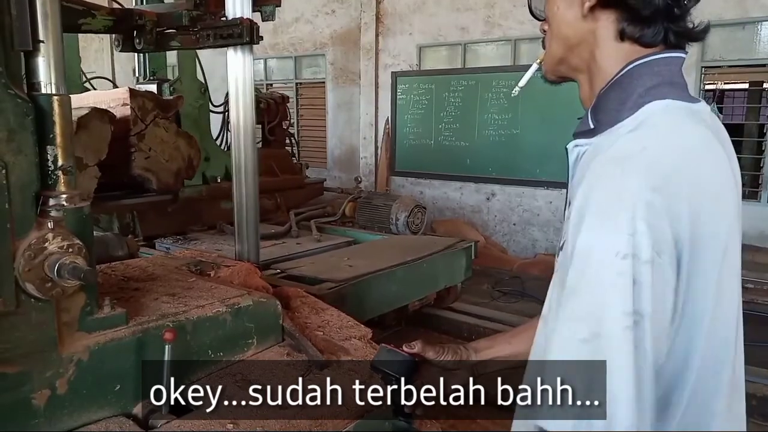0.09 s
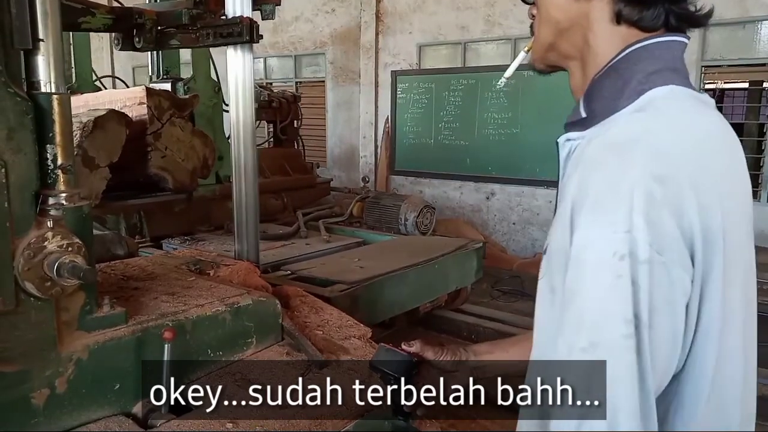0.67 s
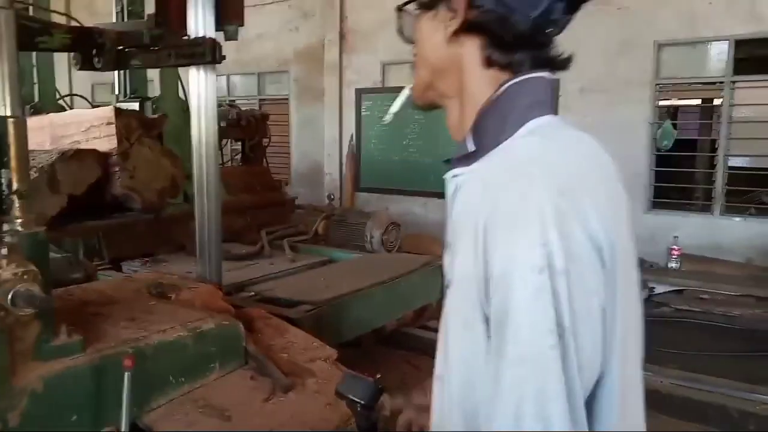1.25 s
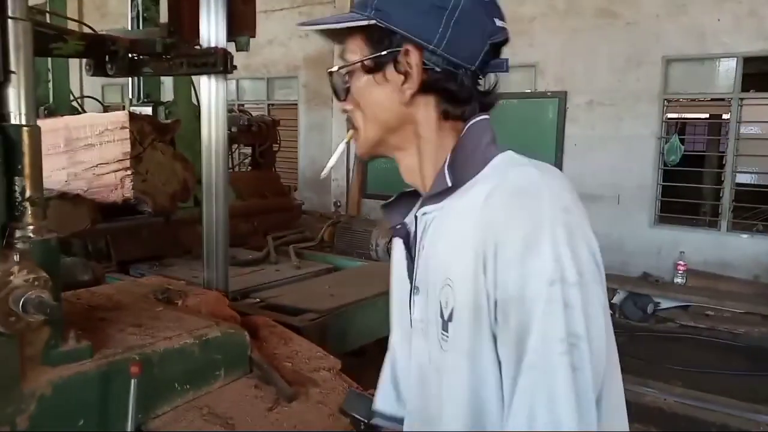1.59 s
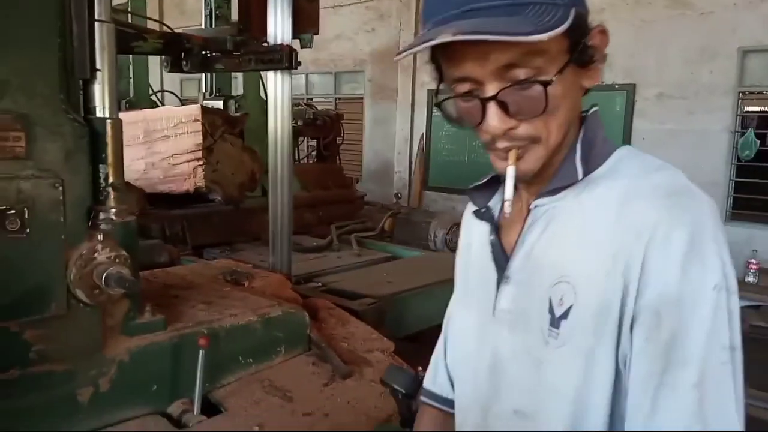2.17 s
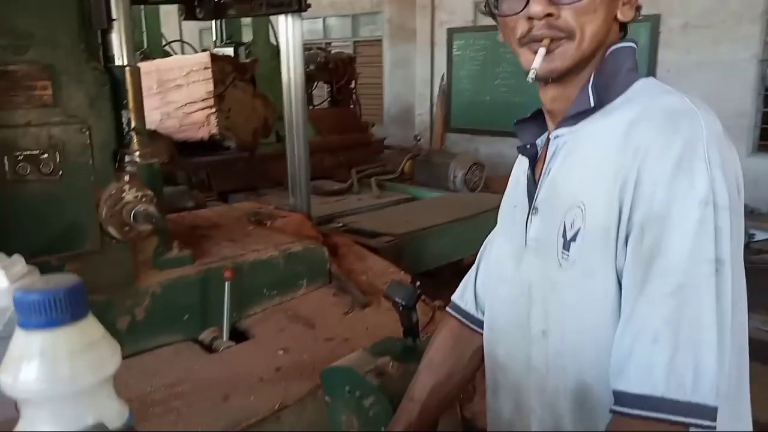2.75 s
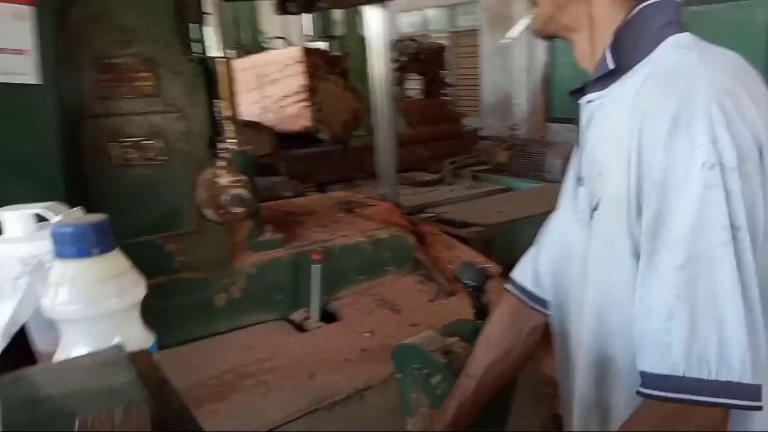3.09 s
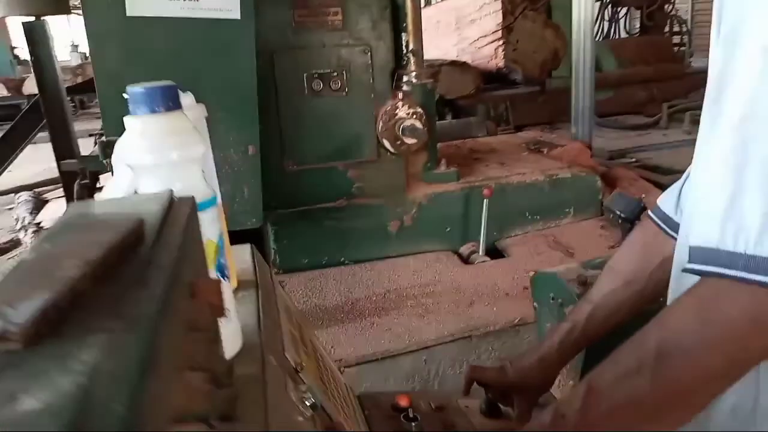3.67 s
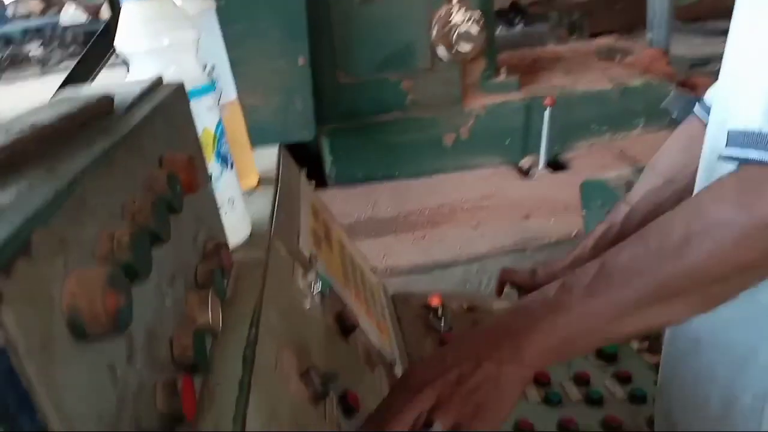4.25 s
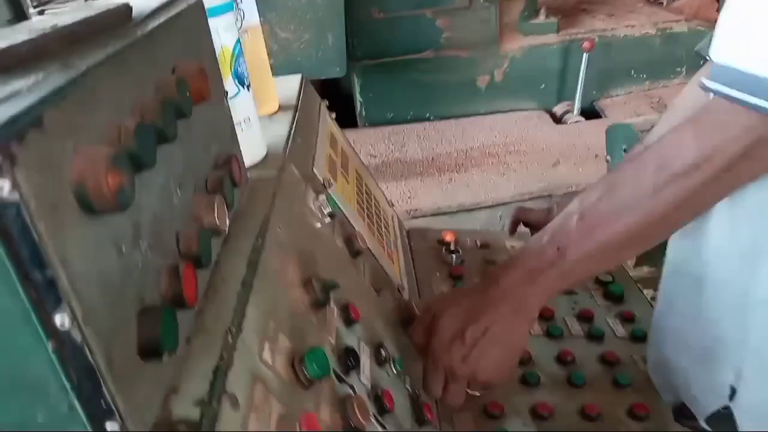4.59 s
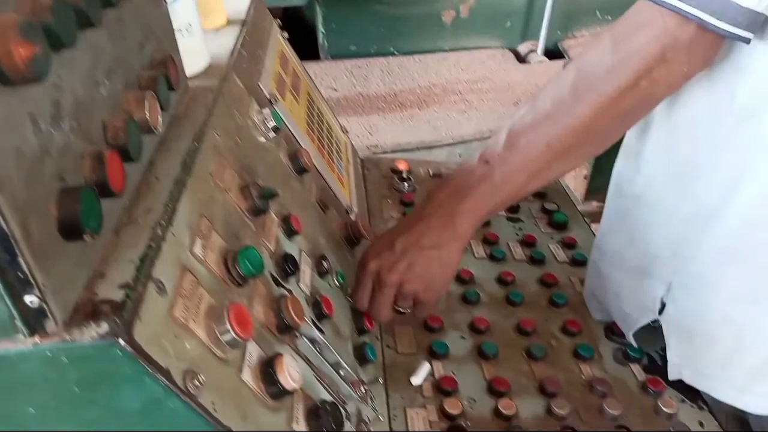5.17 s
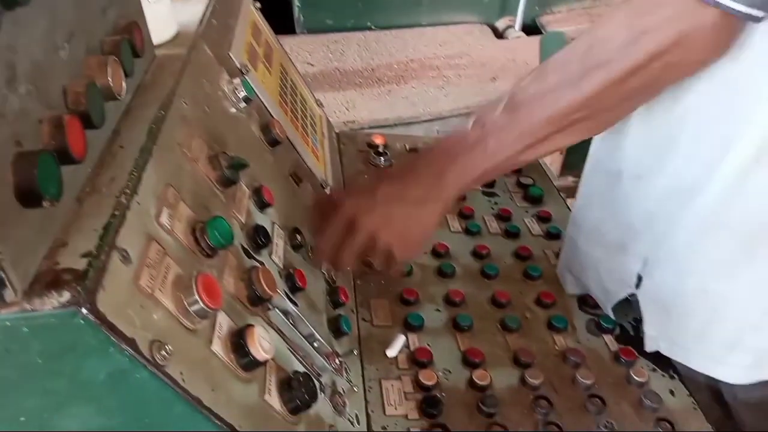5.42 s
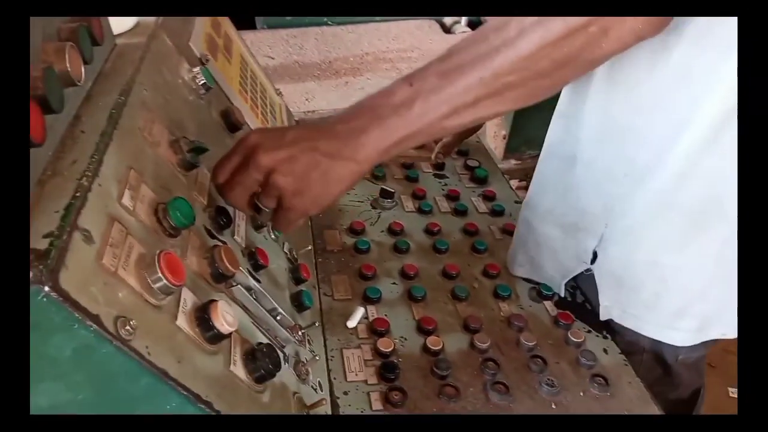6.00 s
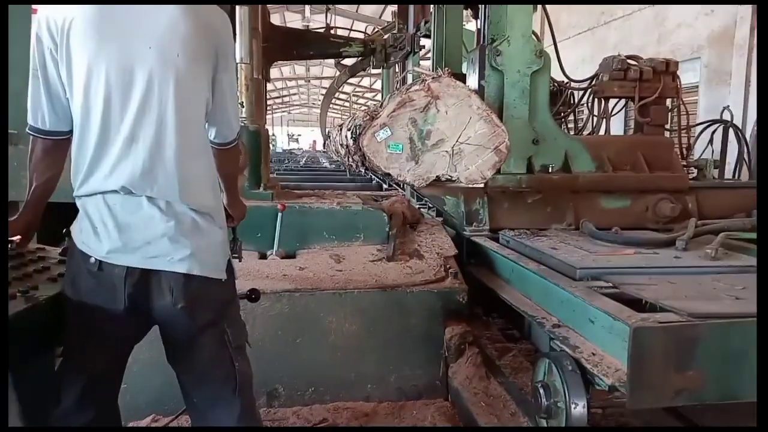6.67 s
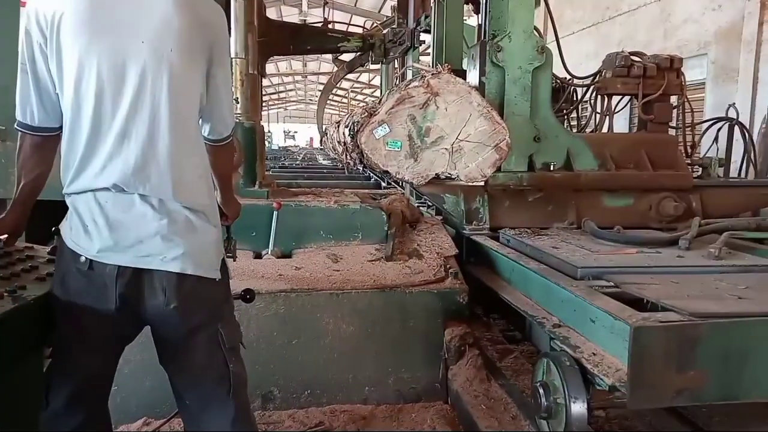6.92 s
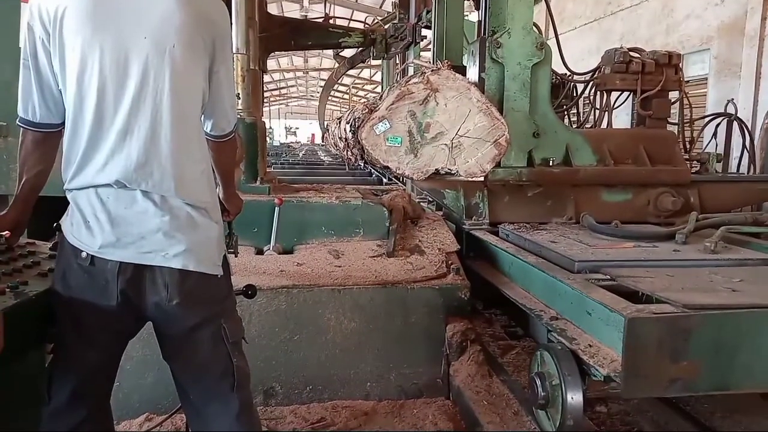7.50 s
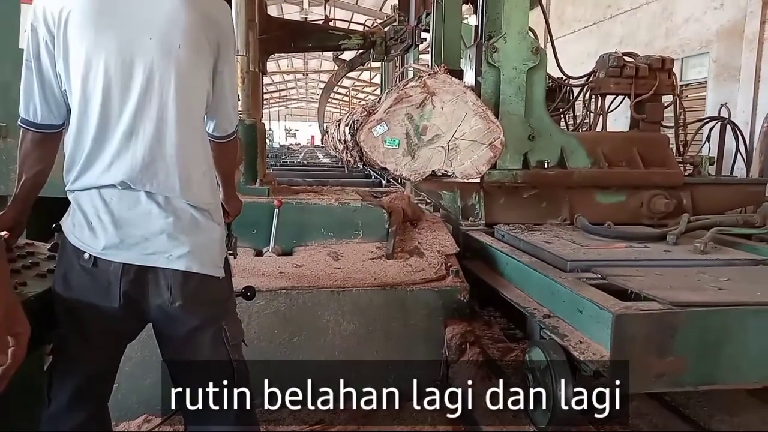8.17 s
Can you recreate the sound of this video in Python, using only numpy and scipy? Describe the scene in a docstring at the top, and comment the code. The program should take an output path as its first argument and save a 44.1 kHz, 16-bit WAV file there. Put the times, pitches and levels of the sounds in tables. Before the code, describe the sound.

Loud band saw ripping wood in a shed, rasping and hissing, with a wavering whine, low drone and a few dull bumps.

```python
"""A big band saw rips a log in a sawmill shed. The stereo microphone starts beside the control desk:
each tooth tears off a chip, so the cut rasps, hisses and whines at the tooth rate over the drone of frame
and drive. From about 1 s come a few dull bumps, and the cut fades a little as the microphone turns to the
controls. Near 4.5 s the loaded blade slows and the whine sags, then recovers. From about 6 s a slow
dissolve leads to the aisle behind the operator, where the same saw runs on."""
import sys
import numpy as np
from scipy import signal
from scipy.fft import rfft, irfft, next_fast_len
from scipy.io import wavfile
from scipy.ndimage import uniform_filter1d, minimum_filter1d, map_coordinates

SR = 44100
rng = np.random.default_rng(int(sys.argv[2]) if len(sys.argv) > 2 else 0)


def master(y):
    """Save y as 16-bit WAV."""
    cut = np.clip(np.atleast_2d(y).T, -1, 1)
    pcm = np.round(cut * 32767)  # scale
    wavfile.write(sys.argv[1], SR, pcm.astype(np.int16))


N = 369999
TEETH_PER_BEND, TEETH_PER_LOOP = 25, 448

# How alike the shed sounds at the two microphones. Each row: frequency in Hz, likeness from 0 to 1.
MIC_LIKENESS = [(40, .2), (100, 0.13), (210, 1), (350, 0.62), (600, 0.72), (1050, 0.58), (1600, 0.27),
                (3000, 0.14), (7000, 0.02)]
# Colour of the saw frame from the desk and from the aisle.
# Each row: frequency in Hz, relative level in dB on the left, the same on the right.
FRAME_AT_DESK = [(25, -69, -78), (60, -64.5, -83), (104, -60.5, -60), (176.6, -54.5, -50.5),
                 (197.3, -39.5, -41), (237, -50, -42.5), (278, -47.5, -50.5), (350, -50.5, -49),
                 (433, -52.5, -57)]
FRAME_IN_AISLE = [(25, -76, -79), (70, -62, -67), (118.94, -61, -66), (165, -57, -60.5),
                  (235, -51.5, -52.5), (310, -50, -58.5), (395, -60, -57), (430, -55, -71)]
# The frame's drone at the desk. Each row: time in seconds, level in dB before the dissolve's fader.
DESK_DRONE = [(.5, -28), (3.5, -30.5), (4.1, -30), (5, -28), (6.2, -28)]
# The machine rumbles more for a moment. Each row: middle in seconds, half length in seconds, rise in dB.
RUMBLE_RISES = [(1.54, 0.42, 7.5), (4.95, 0.26, 3), (8.35, 0.27, 4)]
# Dull bumps in the machine. Each row: start in seconds, peak in dB before panning, pitch in Hz.
MACHINE_BUMPS = [(1.043, -25, 115), (1.372, -22.5, 103), (3.385, -25, 100.6), (3.85, -26, 97),
                 (4.367, -37, 131), (5.291, -27, 142)]
# The blade rubs in the kerf. Each row: middle in seconds, half length in seconds, centre in Hz,
# width in Hz, level in dB before panning.
KERF_RUBS = [(.5, 1, 6534, 330, -23), (2.5, .7, 6596, 160, -30), (2.5, 0.22, 3570, 450, -27),
             (3.498, 0.5, 8200, 170, -29), (4.0, .6, 7280, 240, -29.5), (7.6, .9, 7200, 150, -29),
             (7.85, .35, 3070, 450, -28)]
# The blade slows under load and picks up again. Each row: time in seconds, teeth passing per second.
TOOTH_RATE = [(0, 1577), (.7, 1584), (2.5, 1569), (3.4, 1577), (3.9, 1563), (4.45, 1526), (5.1, 1559),
              (6.2, 1580), (7.2, 1571), (7.7, 1558), (8.39, 1556)]
# Sidebands from the uneven blade. Each row: steps of the bend rate from the tooth tone, relative dB.
BEND_SIDEBANDS = [(-2, -11), (-1, -3), (1, 0), (2, -8)]
# The whine swells as the microphone moves through the shed's standing waves.
# Each row: middle in seconds, half length in seconds, level on the left in dB.
WHINE_SWELLS = [(.13, 0.078, -18), (.46, .2, -27), (1.553, 0.21, -20), (2.25, 0.45, -19),
                (2.85, 0.35, -16.5), (3.684, .06, -20), (4.023, 0.23, -16.5), (4.55, .08, -33),
                (5.04, 0.14, -20), (5.417, .08, -21), (5.9, .12, -33), (6.7, .15, -35), (7.22, 0.2, -29)]
# Resonances of the steel guards and guides. Each row: centre in Hz, width in Hz, boost in dB.
GUARD_RESONANCES = [(485, 23, 1.5), (574, 50, 2.5), (808, 110, 4.5), (1038, 25, 5), (1124, 29, 6),
                    (1200, 28, 1.5), (1340, 31, 2), (1970, 44, 2.5), (2360, 28, 5), (2560, 90, 1)]
# Colour of the cut from the desk and from the aisle.
# Each row: frequency in Hz, relative level in dB on the left, the same on the right.
CUT_AT_DESK = [(400, -52.5, -57.5), (844, -56.5, -60.5), (1120, -51, -55.5), (1700, -43.5, -50.5),
               (1910, -47.5, -62), (3080, -47.5, -61), (4510, -54.5, -68), (5600, -54, -75.5),
               (6860, -47, -74.5), (7810, -49, -96), (9440, -57, -82), (13500, -67.5, -91),
               (14840, -54, -74), (15400, -56.5, -70)]
CUT_IN_AISLE = [(400, -58, -60.5), (1185, -55.5, -60), (1580, -48, -52), (2100, -54, -58.5),
                (2810, -46.5, -53.5), (4170, -55.5, -57), (5700, -55, -57), (7070, -48, -59),
                (8160, -52, -65), (9400, -59.5, -62), (10770, -62, -54.5), (13700, -73, -72),
                (14700, -63, -64), (15400, -65, -67)]
# The microphone turns from the cut to the controls. Each row: time in seconds, change of the rasp in dB.
MIC_FACING = [(.5, 0), (1.3, -1.1), (2.7, -0.3), (3.5, -2.1), (5.6, -2), (6.3, -3)]


def amp(db):
    """Decibels to gain."""
    return 10 ** (np.asarray(db) / 20)


def unit_rms(x):
    """The signal at rms 1."""
    return x / np.sqrt(np.mean(x ** 2) + 1e-20)


def over_frequency(rows, hz):
    """Each column after the frequency, read on a log axis."""
    knots_hz, *columns = np.transpose(rows)
    return np.array([np.interp(np.log(hz + 1), np.log(knots_hz + 1), column) for column in columns])


def over_time(rows):
    """One value per sample from rows of seconds and value."""
    return np.interp(np.arange(N) / SR, *np.transpose(rows))


def bell(middle_s, half_s):
    """A smooth rise to 1 and fall."""
    return np.exp(-((np.arange(N) / SR - middle_s) / half_s) ** 2)


def wobble(rate):
    """A smooth random curve, rate knots a second."""
    return map_coordinates(rng.standard_normal(int(N * rate / SR) + 4), [np.arange(N) * rate / SR])


def filtered(x, response):
    """The signal through a complex response of frequency."""
    size = next_fast_len(N + SR // 2)
    return irfft(rfft(x, size) * response(np.fft.rfftfreq(size, 1 / SR)), size)[..., :N]


def below(hz, edge_hz):
    """A steep low-pass curve, one half at the edge."""
    return 1 / (1 + (hz / edge_hz) ** 12)


def resonance(hz, centre_hz, width_hz):
    """A peak of height 1, its width taken at half height."""
    return 1 / (1 + (2 * (hz - centre_hz) / width_hz) ** 2)


def levelled(pair, low_hz, high_hz):
    """A stereo pair scaled so that one band of its mid signal has rms 1."""
    return pair / np.std(filtered(pair.mean(0), lambda hz: (hz > low_hz) & (hz < high_hz)))


def compressed(x, strength=0.29):
    """A fast compressor: the gain drops whenever the last few milliseconds were loud."""
    power = np.abs(uniform_filter1d(x ** 2, 140))
    return x * (power / power.mean(-1, keepdims=True) + 1e-6) ** (-strength / 2)


def in_shed(source, lag_s=0.000928):
    """Direct sound reaches the left microphone late; the shed's diffuse field differs at the two."""
    likeness = lambda hz: over_frequency(MIC_LIKENESS, hz)
    arrival = lambda hz: np.exp(-2j * np.pi * hz * np.array([[lag_s], [0]]))
    direct = filtered(source, lambda hz: np.sqrt(likeness(hz)) * arrival(hz))
    diffuse = filtered(rng.standard_normal((2, N)), lambda hz: np.sqrt(1 - likeness(hz)))
    return direct + diffuse


def reflections(pair, depth_db):
    """Reflections among the machines shift as the microphone moves, so narrow bands swell and fade."""
    bands = signal.stft(pair, nperseg=1024)[2]
    patches = uniform_filter1d(rng.standard_normal(bands.shape), 3, axis=1)  # smooth across frequency
    patches = uniform_filter1d(patches, 22, axis=2)  # and across time
    return signal.istft(bands * amp(depth_db * unit_rms(patches)), nperseg=1024)[1][:, :N]


def frame(colour, drone_db, rumble_db):
    """Wheels and drive shake the saw frame, which booms near 200 Hz over a rumble that rises at times."""
    shaking = in_shed(rng.standard_normal(N))
    body = filtered(shaking, lambda hz: amp(over_frequency(colour, hz)) * np.sqrt(below(hz, 410)))
    rumble = filtered(body, lambda hz: below(hz, 160))
    drone = amp(drone_db) * levelled(body - rumble, 160, 280)
    rise_db = sum(db * bell(middle_s, half_s) for middle_s, half_s, db in RUMBLE_RISES)
    return drone + amp(rumble_db + rise_db) * levelled(rumble, 60, 150)


def bumps(t60_s=0.087, attack_s=0.006):
    """Soft, heavy knocks that ring only a few cycles, a little right of centre."""
    knocks = np.zeros(N + SR)
    t = np.arange(SR // 2) / SR
    for start_s, db, hz in MACHINE_BUMPS:
        ring = np.sin(2 * np.pi * hz * t) * amp(-60 * t / t60_s) * (1 - np.exp(-t / attack_s))
        knocks[round(start_s * SR):][:len(t)] += amp(db) * ring / np.abs(ring).max()
    return knocks[:N] * amp([[-2], [2]])


def sizzle():
    """Rubbing in the kerf stirs the blade's high modes: swells of narrow noise, far to the left."""
    rubs = np.zeros((2, N))
    for middle_s, half_s, centre_hz, width_hz, db in KERF_RUBS:
        ring = filtered(rng.standard_normal((2, N)), lambda hz: resonance(hz, centre_hz, width_hz))
        rubs += unit_rms(ring) * amp(db) * bell(middle_s, half_s)
    return rubs * amp([[4], [-20]])


def tooth_line(teeth, step, scatter):
    """The tooth tone (step 0) or one of its sidebands; the walls make it shimmer."""
    cycles = teeth * (1 + step / TEETH_PER_BEND)
    shimmer = 1 + scatter * np.array([wobble(18) + 1j * wobble(16) for mic in range(2)])
    lag_cycles = np.array([[0], [(step - 1) / 5]])  # each line has its own phase at the right microphone
    return np.sqrt(2) * np.real(shimmer * np.exp(2j * np.pi * (cycles - lag_cycles)))


def whine_swells(teeth, right_db=-16.5):
    """The whine swells and fades, mostly on the left, as the microphone moves through standing waves."""
    swells = sum(amp(db) * bell(middle_s, half_s) for middle_s, half_s, db in WHINE_SWELLS)
    return swells * tooth_line(teeth, step=0, scatter=0.15) * amp([[0], [right_db]])


def whine(teeth, tone_db, sidebands_db, right_db, drift_db=1.9):
    """The steady tooth tone; bends in the blade add fluttering sidebands, and each line drifts in level."""
    lines = [(0.00039, tone_db)] + [(step, sidebands_db + db) for step, db in BEND_SIDEBANDS]
    pair = sum(amp(db + drift_db * wobble(4)) * tooth_line(teeth, step, scatter=0.45) for step, db in lines)
    return pair * amp([[0], [right_db]])


def guards_db(hz):
    """How much the steel around the cut lifts each frequency."""
    return sum(db * resonance(hz, centre_hz, width_hz) for centre_hz, width_hz, db in GUARD_RESONANCES)


def blade_pattern(teeth, points_per_tooth=28):
    """Every tooth has its own set and edge, so this rasp comes round again with each loop of the blade."""
    edges = rng.standard_normal(TEETH_PER_LOOP * points_per_tooth)
    position = teeth % TEETH_PER_LOOP * points_per_tooth
    return unit_rms(map_coordinates(edges, [position], mode="grid-wrap"))


def chips(teeth, bite=0.68):
    """A burst of tearing noise for each tooth that enters the wood."""
    return unit_rms(rng.standard_normal(N) * (1 + bite * np.cos(2 * np.pi * teeth)))


def cut(teeth, colour, rasp_db, hiss_db, loop_share, reflections_db, grain_db=0.29):
    """Tearing wood rasps, fluttering with the grain; above it hisses a dense spray of sawdust."""
    pattern = np.array([blade_pattern(teeth), blade_pattern(teeth)])
    tearing = np.sqrt(1 - loop_share) * in_shed(chips(teeth)) + np.sqrt(loop_share) * pattern
    tearing = reflections(tearing, reflections_db)
    tone = lambda hz: amp(over_frequency(colour, hz) + guards_db(hz))
    wood = filtered(tearing, lambda hz: tone(hz) * np.sqrt(1 - below(hz, 410)))
    rasp = filtered(wood, lambda hz: below(hz, 4300))
    hiss = levelled(compressed(wood - rasp), 5500, 9000)
    rasp = levelled(rasp, 900, 1450)
    return rasp * amp(rasp_db + grain_db * wobble(16)) + hiss * amp(hiss_db)


def saw_from_desk(teeth):
    """Microphone beside the controls: rasp, hiss and sidebands follow how squarely it faces the cut."""
    facing_db = over_time(MIC_FACING)
    wood = cut(teeth, CUT_AT_DESK, rasp_db=-24 + facing_db, hiss_db=-19 + 0.4 * facing_db,
               loop_share=0.17, reflections_db=1.66)
    blade = whine(teeth, tone_db=-32.5, sidebands_db=-26.5 + 3.2 * facing_db, right_db=-4)
    return wood + blade + frame(FRAME_AT_DESK, drone_db=over_time(DESK_DRONE), rumble_db=-41.5)


def saw_from_aisle(teeth):
    """Microphone in the aisle behind the operator, where the cut holds steady."""
    wood = cut(teeth, CUT_IN_AISLE, rasp_db=-28.5, hiss_db=-21, loop_share=0.16, reflections_db=1.6)
    blade = whine(teeth, tone_db=-33, sidebands_db=-41, right_db=-2.5)
    return wood + blade + frame(FRAME_IN_AISLE, drone_db=-35.5, rumble_db=-46)


def scene():
    """The desk position fades down as the aisle fades up, so the level dips between them."""
    teeth = np.cumsum(over_time(TOOTH_RATE)) / SR  # count of teeth that have passed
    desk_fader = over_time([(5.75, 0.9), (6.2, 0.56), (6.75, 0.22), (7, 0.16)])
    aisle_fader = over_time([(6.15, 0.032), (6.3, 0.22), (6.75, 0.57), (7.25, 0.94)])
    saw = desk_fader * saw_from_desk(teeth) + aisle_fader * saw_from_aisle(teeth)
    return saw + whine_swells(teeth) + sizzle() + bumps()


def record(dry, drive_db=0.66, ceiling=0.98, window_samples=30, top_hz=15600):
    """A fast limiter holds each channel's peaks near full scale; nothing is kept above the band limit."""
    loud = dry * amp(drive_db)
    needed_gain = np.minimum(1, ceiling / (np.abs(loud) + 1e-9))
    gain = uniform_filter1d(minimum_filter1d(needed_gain, window_samples), window_samples)
    return filtered(loud * gain, lambda hz: hz < top_hz)


dry = scene()
out = record(dry)
master(out)
```